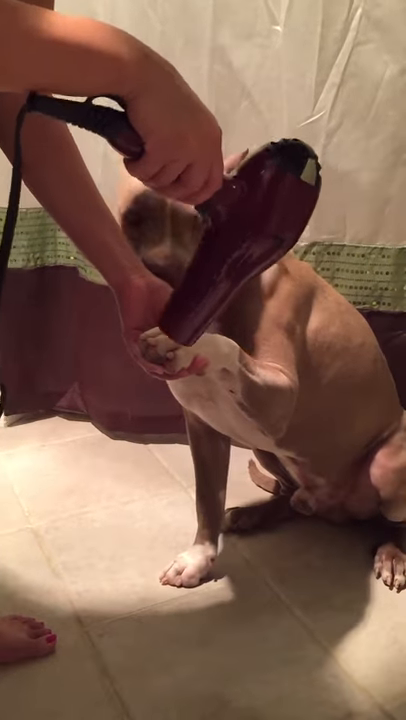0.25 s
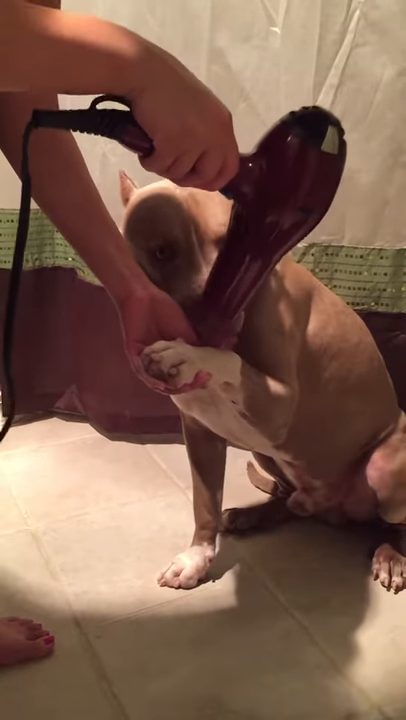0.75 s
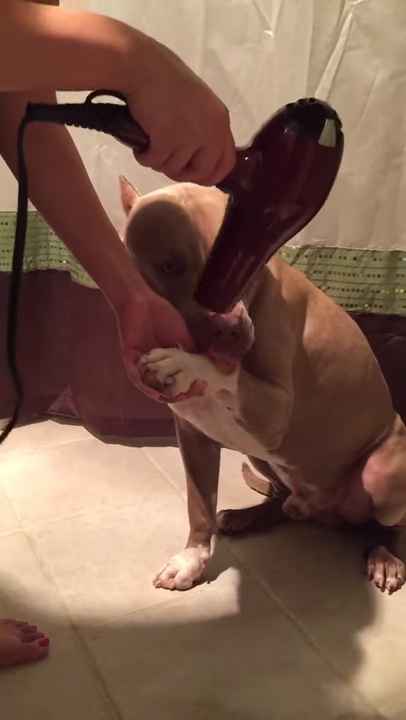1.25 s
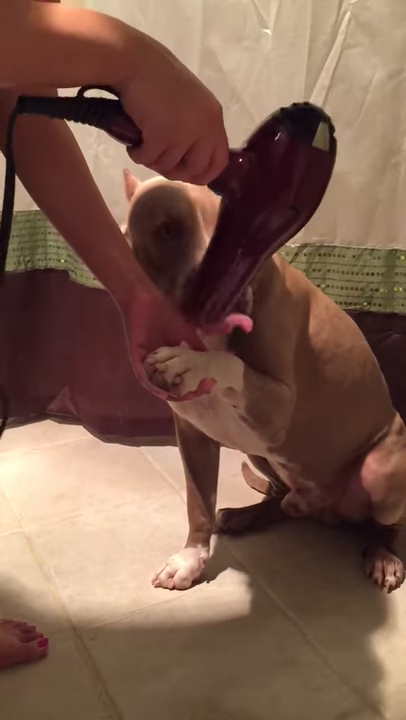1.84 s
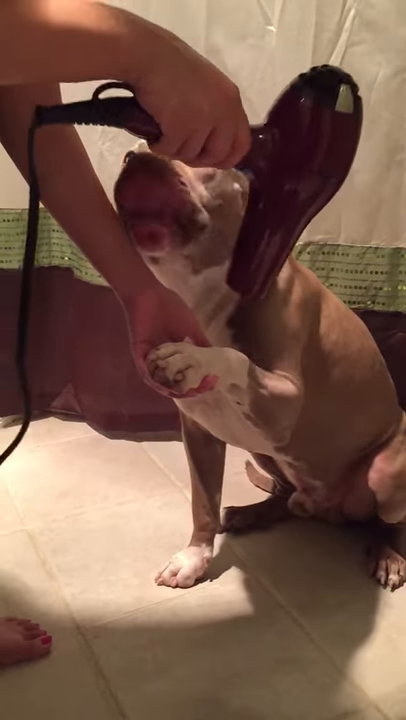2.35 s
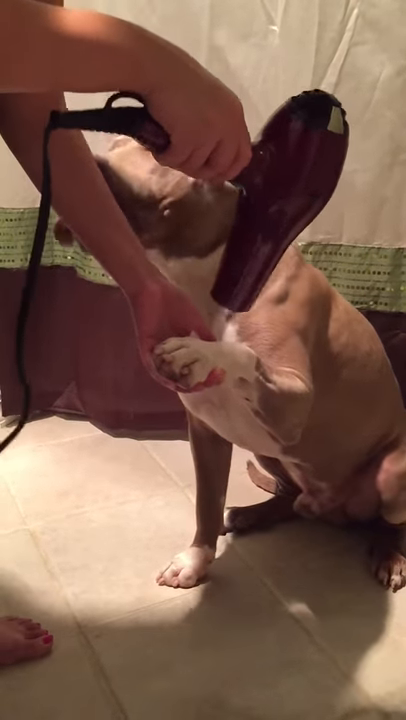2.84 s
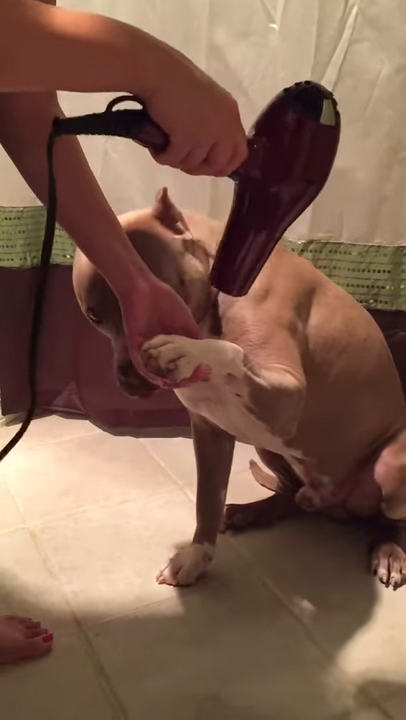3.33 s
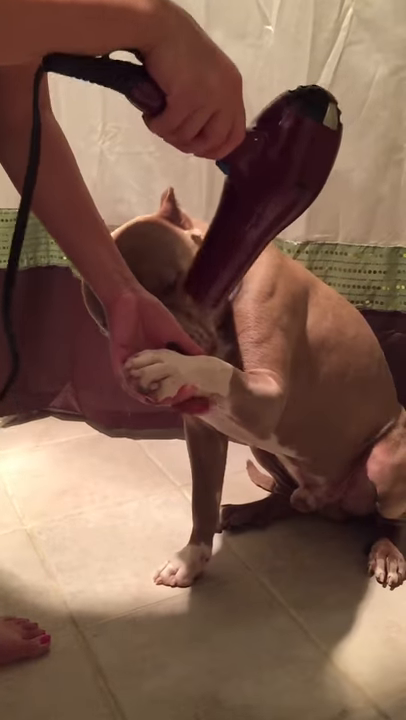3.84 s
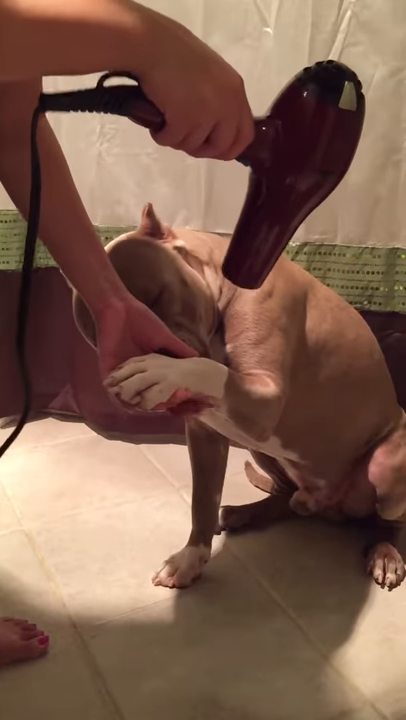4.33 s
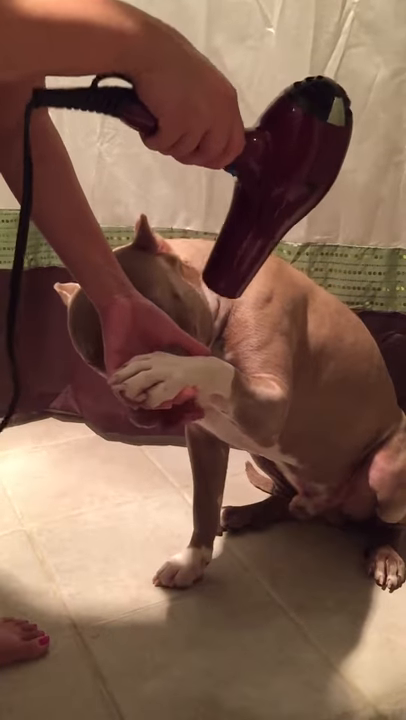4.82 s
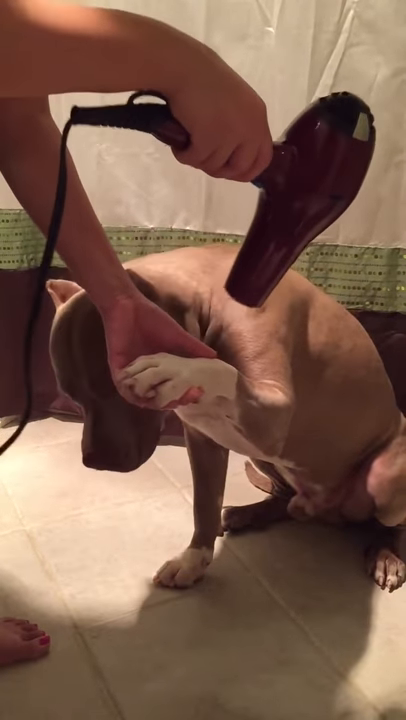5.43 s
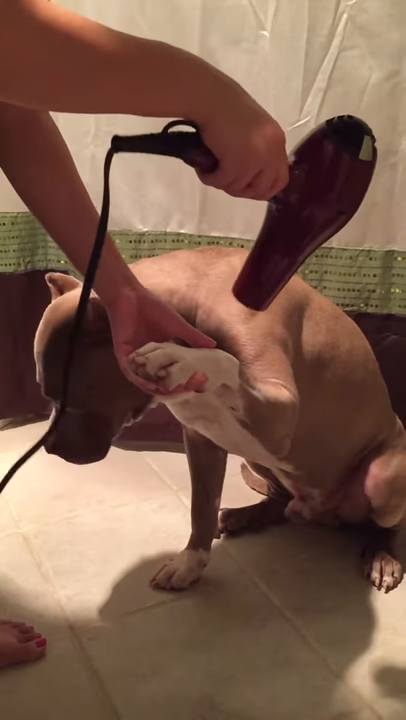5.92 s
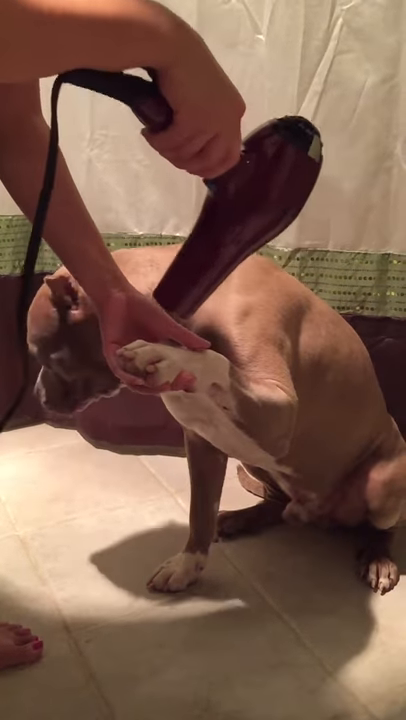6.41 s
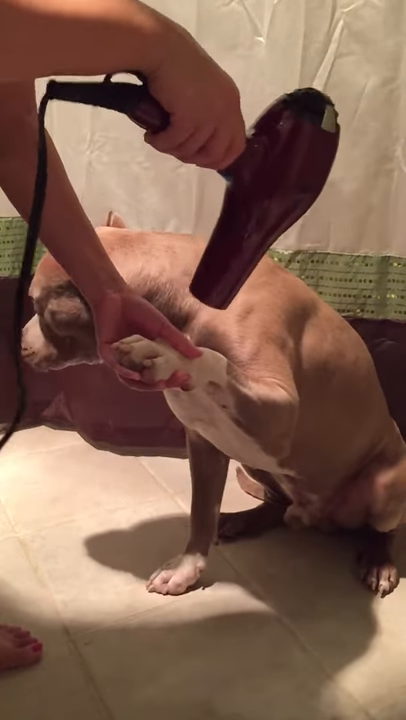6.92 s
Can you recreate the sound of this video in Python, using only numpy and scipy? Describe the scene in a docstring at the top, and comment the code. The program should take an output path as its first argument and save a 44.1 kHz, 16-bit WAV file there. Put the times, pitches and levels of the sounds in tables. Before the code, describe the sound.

A handheld hair dryer runs steadily in a tiled bathroom, with a roar of air, a bright hiss and a high fan whine.

```python
"""A handheld hair dryer roars steadily in a tiled bathroom, drying a dog's paw and shoulder.
Rushing air makes the housing and room ring, the intake howls and the nozzle hisses.
The eight-blade fan whines, its speed rippling with the mains power. As the hand turns the dryer,
the whine swells while its third harmonic and the roar ease a little.
Now and then the jet of air hits the coat with a soft, low rumble."""
import sys
import numpy as np
from scipy import signal
from scipy.fft import rfft, irfft, next_fast_len
from scipy.io import wavfile
from scipy.ndimage import uniform_filter1d, map_coordinates

SR = 44100
rng = np.random.default_rng(int(sys.argv[2]) if len(sys.argv) > 2 else 0)


def file_out(sig):
    """Save sig as 16-bit WAV at sys.argv[1]."""
    # one column per channel
    cols = np.atleast_2d(sig).T
    # limit, then scale
    lim = np.clip(cols, -1, 1)
    pcm = np.round(lim * 32767).astype(np.int16)
    wavfile.write(sys.argv[1], SR, pcm)


N = 316180

# Tone colour of the air swirling inside the dryer: (frequency [Hz], relative level [dB])
ROAR_SPECTRUM = [(25, -37.2), (45, -26), (70, -14), (180, -17.5), (400, -9.5), (540, -12), (700, -5.5),
                 (1100, -5), (1700, -0.55), (2000, 0.5), (2280, -7), (3300, -4.5), (4200, -17.5),
                 (6000, -43)]
# Rise and fall of the howl at the air intake: (time [s], relative level [dB])
HOWL_LEVELS = [(0.0, -38), (0.56, -35.5), (1.29, -37), (2.46, -37), (2.7, -37), (5.04, -36.5), (6.4, -39),
               (6.81, -36), (7.17, -36.5)]
def air_roar(roar_db=-29.0, dip_per_swell=0.049, howl_hz=2620, howl_width_hz=520, rumble_hz=175):
    """Swirling air in three parts: a roar in the housing, a howl at the intake, a rumble on the coat."""
    howl_db, = curves(HOWL_LEVELS)
    howl_db = howl_db.mean() + 0.5 + 1.6 * (howl_db - howl_db.mean())  # a bit louder, with wider swings
    air = swirling_air(ROAR_SPECTRUM, drift_db=1.6)
    howl = filtered(air, lambda hz: 1 / (1 + (2 * (hz - howl_hz) / howl_width_hz) ** 4))
    rumble = filtered(air, lambda hz: 1 / (1 + (hz / rumble_hz) ** 8))
    roar = amp(roar_db - dip_per_swell * whine_swell_db()) * unit(air - howl - rumble)
    return roar + amp(howl_db) * unit(howl) + coat_gusts() * unit(rumble)


# Tone colour of the air at the grille and nozzle: (frequency [Hz], relative level [dB])
HISS_SPECTRUM = [(2000, -31.5), (3700, -3), (4650, 0.3), (4950, -5.5), (5200, -1.5), (6200, 0),
                 (7150, -0.5), (7450, -7.5), (8800, -5.5), (9800, -9), (10450, -12.5), (11000, -9),
                 (13000, -12), (15600, -14.5)]
# Rise and fall of the hiss: (time [s], relative level [dB])
HISS_LEVELS = [(0.0, -36), (1.33, -35.5), (3.87, -36), (4.79, -35), (6.28, -36.5), (7.17, -36.5)]
def nozzle_hiss(ripple, boost_db=1.69, pulsing=0.025):
    """Air hisses out of the nozzle, pulsing a little with the motor's turning force."""
    hiss_db, = curves(HISS_LEVELS)
    return amp(hiss_db + boost_db) * (1 + pulsing * ripple) * swirling_air(HISS_SPECTRUM, drift_db=2.0)


# How fast the motor spins: (time [s], speed [turns per second])
MOTOR_SPEEDS = [(0.0, 221.7), (3.0, 223.55), (3.7, 224.4), (4.9, 223.45), (5.7, 223.5), (6.4, 223.0)]
# The whine as the dryer is aimed about: (time [s], relative level [dB])
WHINE_LEVELS = [(0.0, -40.3), (0.12, -38.8), (0.32, -46.4), (0.48, -40.3), (1.97, -39.2), (2.18, -44.7),
                (2.66, -38.8), (3.26, -36.8), (3.34, -40.3), (3.79, -37.7), (3.95, -44.8), (4.51, -45.2),
                (4.71, -40.1), (5.84, -34.8), (6.0, -38.9), (6.69, -33.7), (6.97, -39.3), (7.17, -36.8)]
# Higher tones of the whine: (pitch [times the whine's], level [dB], change [dB per dB of swell])
WHINE_HARMONICS = [(2, -51, 0), (3, -51, -0.3)]
# Faint tones of the motor: (pitch [times the motor speed], level [dB])
MOTOR_TONES = [(15, -60), (23, -62), (32, -61), (40, -68), (48, -69)]
def fan_whine(ripple, blades=8, boost_db=3.3, flutter_db=1.55, fading_db=4.5, pulsing=0.27):
    """Blades chop the air into a whine; the ripple in their speed adds a buzz to every tone."""
    speed, = curves(MOTOR_SPEEDS)
    whine_db, = curves(WHINE_LEVELS)
    speed *= 1 + 0.0033 * ripple + 0.00066 * wobble(25)  # mains ripple and a slight random waver
    motor_angle = 2 * np.pi * np.cumsum(speed) / SR
    blade_angle = blades * motor_angle
    whine = amp(whine_db + boost_db + flutter_db * wobble(20)) * np.sin(blade_angle)
    # each higher tone fades on its own in the room's loud and quiet spots
    harmonics = sum(
        amp(db + change * whine_swell_db() + fading_db * wobble(12)) * np.sin(multiple * blade_angle)
        for multiple, db, change in WHINE_HARMONICS)
    motor = sum(amp(db + fading_db * wobble(6)) * np.sin(multiple * motor_angle)
                for multiple, db in MOTOR_TONES)
    return np.sqrt(2) * (whine + (1 + pulsing * ripple) * (harmonics + motor))


def whine_swell_db():
    """How far the aim of the dryer lifts the whine above its average level."""
    whine_db, = curves(WHINE_LEVELS)
    return whine_db - whine_db.mean()


# Moments when the jet catches the coat: (peak time [s], length [s], level [dB])
COAT_GUSTS = [(1.2, .3, -54), (4.22, 0.27, -47), (4.42, .2, -51), (5.27, 0.33, -50), (5.53, 0.13, -45),
              (6.445, 0.24, -52)]
def coat_gusts(steady_db=-56.0):
    """How hard the air beats on the coat: a steady amount plus a smooth bump for each gust."""
    t = np.arange(N) / SR
    bumps = sum(amp(db) ** 2 * np.exp(-8 * ((t - peak) / length) ** 2) for peak, length, db in COAT_GUSTS)
    return np.sqrt(amp(steady_db) ** 2 + bumps)


# Low pitches at which the barrel and tiled room ring: (frequency [Hz], width [Hz], boost [dB])
ROOM_RESONANCES = [(89, 19, 8), (147, 14, 7), (218.5, 32, 11.5), (244.7, 41, 8.5), (296, 37, 8.5),
                   (448, 8.1, 5), (514, 33.4, 14.5), (575, 21.7, 17.5), (606, 30.5, 12),
                   (634.8, 19.7, 15.5), (666.5, 26, 9), (742.5, 22.5, 9), (781, 27, 10), (851, 18, 9.5),
                   (895.5, 39, 9), (948, 25, 5), (1009.5, 99, 10.5), (1104, 13, 7), (1194.5, 19, 9.5)]
# Higher pitches at which the housing rings: (frequency [Hz], width [Hz], boost [dB])
HOUSING_RESONANCES = [(1355, 84, 7.5), (1443, 48, 4.5), (1848, 25, 5.0), (1931, 97, 3.9), (2151, 31, 3.8),
                      (2399, 71, 6.1), (2570, 144, 7.1), (2727, 149, 8.8), (3136, 170, 3.3),
                      (4128, 142, 4.1), (4554, 190, 3.4)]
def resonance_db(hz):
    """The room and housing boost sound near the pitches at which they ring."""
    return sum(db / (1 + (2 * (hz - centre) / width) ** 2)
               for centre, width, db in [*ROOM_RESONANCES, *HOUSING_RESONANCES])


def swirling_air(spectrum, drift_db):
    """Air noise whose tone colour drifts, because echoes shift as the dryer moves."""
    grid = signal.stft(rng.standard_normal(N), nperseg=1024)[2]  # noise split by pitch and time
    patches = rng.standard_normal(grid.shape)
    patches = uniform_filter1d(patches, size=3, axis=0)  # smooth across pitch
    patches = uniform_filter1d(patches, size=45, axis=1)  # smooth across time
    noise = signal.istft(grid * amp(drift_db * unit(patches)), nperseg=1024)[1][:N]
    return unit(filtered(noise, lambda hz: amp(along(spectrum, hz) + resonance_db(hz))))


def amp(db):
    """Turn decibels into a volume multiplier."""
    return 10 ** (np.asarray(db) / 20)


def unit(x):
    """Scale a signal to an average strength (rms) of 1."""
    return x / np.sqrt(np.mean(x ** 2) + 1e-20)


def along(points, hz):
    """Read between the rows of a frequency table, on a pitch (log) scale."""
    frequencies, values = np.transpose(points)
    return np.interp(np.log(hz + 1), np.log(frequencies + 1), values)


def curves(rows):
    """Join the rows of a time table with straight lines, one value per sample."""
    times, *columns = np.transpose(rows)
    return [np.interp(np.arange(N) / SR, times, column) for column in columns]


def wobble(rate):
    """A smooth curve through `rate` random points a second."""
    return map_coordinates(rng.standard_normal(int(N * rate / SR) + 4), [np.arange(N) * rate / SR])


def filtered(x, response):
    """Turn each frequency of x up or down by response(hz)."""
    size = next_fast_len(N + SR // 2)
    return irfft(rfft(x, size) * response(np.fft.rfftfreq(size, 1 / SR)), size)[..., :N]


def scene(mains_hz=60):
    """The whole dryer, running on mains power, the same in both channels."""
    ripple = np.sin(2 * np.pi * mains_hz * np.arange(N) / SR)
    dryer = air_roar() + nozzle_hiss(ripple) + fan_whine(ripple)
    return np.array([dryer, dryer])


def record(dry):
    """The microphone loses the very highest treble."""
    top_hz = 15750
    return filtered(dry, lambda hz: hz < top_hz)


dry = scene()
out = record(dry)
file_out(out)
```